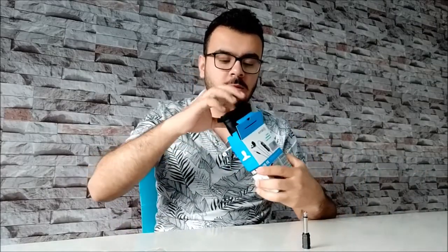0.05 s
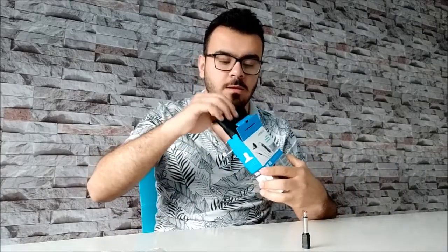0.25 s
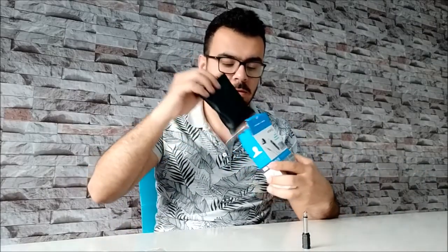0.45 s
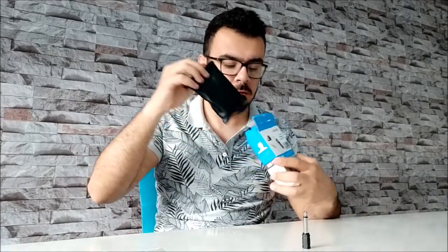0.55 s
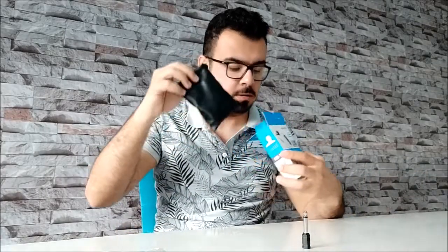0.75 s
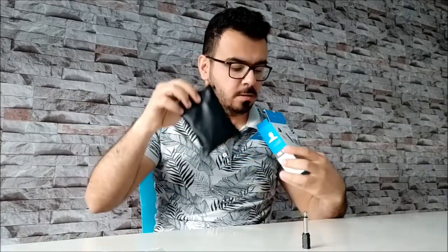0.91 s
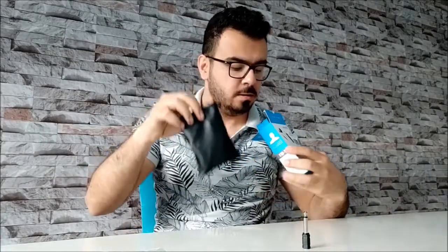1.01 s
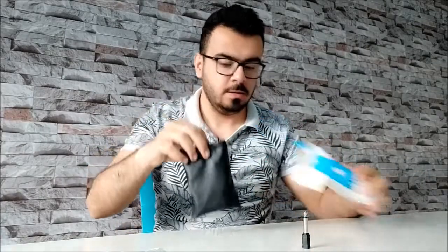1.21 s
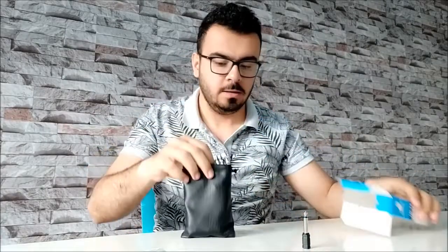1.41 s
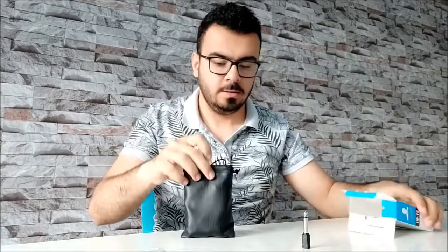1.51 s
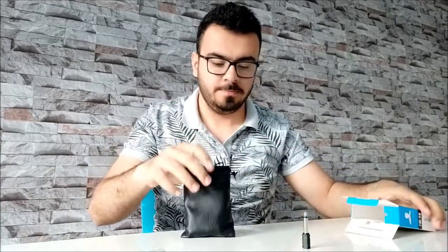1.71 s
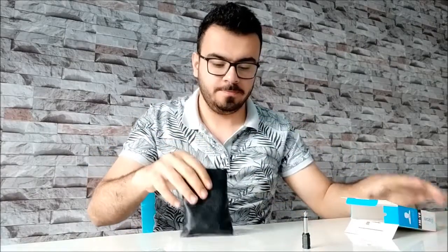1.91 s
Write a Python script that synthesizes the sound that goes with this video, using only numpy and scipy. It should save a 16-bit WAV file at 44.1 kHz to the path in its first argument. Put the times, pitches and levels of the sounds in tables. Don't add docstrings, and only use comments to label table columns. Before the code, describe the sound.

A light cardboard box gives up a soft pouch with a quick rub and pop, rustles quietly, then lands hollow on a tabletop, skids and settles with a last nudge; close stereo in a small reflective room with faint hiss.

```python
import sys
import numpy as np
from scipy import signal
from scipy.fft import rfft, irfft, next_fast_len
from scipy.io import wavfile
from scipy.ndimage import uniform_filter1d, minimum_filter1d, map_coordinates

SR = 44100
rng = np.random.default_rng(int(sys.argv[2]) if len(sys.argv) > 2 else 0)


def transcribe(u):
    v = np.clip(np.atleast_2d(u).T, -1, 1)
    q = np.round(v * 32767).astype(np.int16)
    wavfile.write(sys.argv[1], SR, q)


def gain_from_db(level_db):
    decades = np.asarray(level_db, float) / 20
    return 10 ** decades


N = 85995

# frequency in Hz, level in dB per Hz.
CARDBOARD = [(760, -12), (1300, -12), (2280, -9), (3200, -10), (3930, -9), (7250, -14), (9760, -4),
             (14300, -22), (15000, -49)]
# frequency in Hz, level in dB per Hz.
TABLE_TOP = [(600, -21), (1500, -2.5), (2100, -6.5), (2700, 1), (3350, -13), (3900, -1.5), (4600, -14),
             (9750, -3.5), (14500, -17.5)]
# frequency in Hz, width in Hz, level in dB.
OPEN_BOX = [(487, 150, -10), (1010, 100, -5.5), (1830, 160, -9)]
# frequency in Hz, width in Hz, level in dB.
BENT_BOX = [(706, 110, 0.85), (2410, 290, 0.71)]
# frequency in Hz, width in Hz, level in dB.
LAID_BOX = [(580, 270, -29), (238, 300, 3.5), (1050, 1560, -6)]
SIDES = np.array([[0.5], [-0.5]])


def unit(x):
    return x / np.sqrt(np.mean(x ** 2) + 1e-20)


def along(points, hz):
    f, value = np.transpose(points)
    return np.interp(np.log(hz + 1), np.log(f + 1), value)


def filtered(x, response):
    m = next_fast_len(x.shape[-1] + 8192)
    spectrum = rfft(x, m) * response(np.fft.rfftfreq(m, 1 / SR))
    return irfft(spectrum, m)[..., :x.shape[-1]]


def wobble(rate, size=N):
    return map_coordinates(rng.standard_normal(2000), [np.arange(size) * rate / SR])


def paired(spectrum, gain=1, size=N):
    # frequency in Hz, left-right likeness from 0 to 1.
    likeness = [(30, 0.62), (200, 0.59), (800, 0.2), (2000, 0.048), (10000, 0.043)]

    def mid_and_side(hz):
        turn = np.arccos(np.clip(along(likeness, hz), -1, 1)) / 2
        return gain_from_db(along(spectrum, hz)) * np.array([np.cos(turn), np.sin(turn)])

    mid, side = filtered(gain * rng.standard_normal((2, size)), mid_and_side)
    return unit(np.array([mid + side, mid - side]))


def patchy(x, depth_db):
    z = signal.stft(x, nperseg=256)[2]
    field = rng.standard_normal(z.shape[1:])
    field = uniform_filter1d(field, size=2, axis=0)
    field = uniform_filter1d(field, size=7, axis=1)
    return unit(signal.istft(z * gain_from_db(depth_db * unit(field)), nperseg=256)[1][:, :N])


def hollow_response(resonances, f):
    total = 0
    for k, (center, width, db) in enumerate(resonances):
        loss = 1j * f * width
        total = total + (-1) ** k * gain_from_db(db) * loss / (center * center - f * f + loss)
    return total


def rub(stroke, surfaces, boxes, grain_db, rate, turn_s=1, spike_db=1.5):
    s, level_db, hollow_db = np.transpose(stroke)
    t = np.arange(N) / SR
    clumps = gain_from_db(grain_db * wobble(rate) + spike_db * wobble(900))
    rings = filtered(clumps * rng.standard_normal(N),
                     lambda f: np.array([hollow_response(box, f) for box in boxes]))
    after = np.clip((t - turn_s) / 0.021 + 0.5, 0, 1)
    before = 1 - after
    grit = [patchy(paired(surface, clumps), depth_db=3) for surface in surfaces]
    body = unit(rings[0]) * before + unit(rings[1]) * after
    body = body * gain_from_db(np.interp(t, s, hollow_db) - 10.5)
    stroke_gain = gain_from_db(np.interp(t, s, level_db, -120, -120))
    return stroke_gain * (grit[0] * before + grit[1] * after + body)


def knocks(events, partials, below, lag_s, pan_db):
    # frequency in Hz, level in dB.
    crack_color = [(120, -13), (350, 3), (1000, 9), (3000, -2), (6000, -15), (9500, -6), (14000, -45)]
    out = np.zeros((2, N + SR))
    t = np.arange(SR // 6) / SR
    rise = 1 - np.exp(-t / 0.0018)
    for s, db, hz, t60, crack_db in events:
        uneven_db = rng.standard_normal(20)
        drift = 0.82 * wobble(170, size=len(t)) * (1 - np.exp(-t / 0.0046))
        modes = [(hz * ratio, d, abs(t60) * share) for ratio, d, share in partials] + below
        ring = 0
        for (f, d, life), extra_db in zip(modes, uneven_db):
            decay = gain_from_db(d + extra_db - 60 * t / max(life, 0.005))
            phase = 2 * np.pi * f * (t - lag_s * SIDES) + drift * min(f / hz, 1)
            ring = ring + decay * np.sin(phase)
        crack = paired(crack_color, size=len(t)) * gain_from_db(crack_db - 60 * t / 0.015)
        start = round(s * SR)
        out[:, start:start + len(t)] += gain_from_db(db + pan_db * SIDES) * (ring + crack) * rise
    return out[:, :N]


def pouch_slides_out():
    # time in seconds, rubbing in dB, hollow answer of the box in dB.
    pull = [
        (0.1, -75.5, 13.5),
        (0.202, -47.5, 3.5),
        (0.38, -38, -1),
        (0.388, -46.5, 5),
        (0.488, -65.5, -19),
        (0.496, -59.5, 19.5),
        (0.554, -68, -3),
        (0.584, -64, 9),
        (0.68, -78, -6),
    ]
    # frequency in Hz, level in dB per Hz.
    pouch = [(800, -57), (1500, -13.5), (2600, -12), (4300, -20), (7000, -4), (8500, -2), (12500, -11.5),
             (14500, -15)]
    # frequency in Hz, width in Hz, level in dB.
    held_box = [(748, 146, 7), (967, 70, 8.5), (1030, 160, 0)]
    empty_box = [(650, 150, -3), (360, 62, -6), (1340, 450, -4.5)]
    return rub(pull, [pouch, CARDBOARD], [held_box, empty_box], 0.31, 119.2, turn_s=0.369)


def seam_snaps():
    # time in seconds, peak in dB, pitch in Hz, T60 in seconds, crack in dB.
    seam = [
        (.375, -29, 765, 0.029, -22),
        (.38, -16.5, 741, 0.033, -7.5),
    ]
    # ratio to the pitch, level in dB, share of the T60.
    rim = [(0.96, 1, 1.05), (0.472, -9.5, 0.94), (.8, -10.5, 1.92), (1.235, -7.5, 1.31), (1.4, -8, 1.03),
           (2.17, -10.5, 0.8), (3.34, -17, 0.74)]
    return knocks(seam, rim, [], lag_s=-0.00003, pan_db=0.0)


def box_lands():
    # time in seconds, peak in dB, pitch in Hz, T60 in seconds, crack in dB.
    landings = [(1.406, -28, 674, 0.021, -4.5), (1.415, -41.5, 540, 0.027, 7),
                (1.441, -22, 556, 0.049, -13), (1.459, -31.5, 666, 0.051, -1.5),
                (1.469, -37, 562, 0.061, -2), (1.503, -33, 598, 0.074, -17), (1.534, -40, 565, 0.082, 6.5),
                (1.666, -41, 616, 0.053, -34), (1.7025, -43.5, 488, 0.077, 1),
                (1.723, -50.5, 479, 0.11, -17), (1.752, -57, 476, .07, -10), (1.793, -52.5, 780, 0.03, 9.5),
                (1.804, -47, 700, .03, -5), (1.812, -54, 810, 0.015, 0), (1.836, -55.5, 867, 0.04, 5),
                (1.87, -56, 800, 0.032, -3)]
    # ratio to the pitch, level in dB, share of the T60.
    pressed = [(1, 3, 0.89), (.8, -19, 0.82), (1.205, -0.5, 0.39)]
    # frequency in Hz, level in dB, T60 in seconds.
    thump = [(100, -27, 0.21), (177, -19.5, 0.1), (232, -18.5, 0.11), (291.3, -18.5, 0.15),
             (1045, -2, 0.021), (1110, -25, .03), (1580, -11, 0.037), (1910, -15, 0.023), (2260, -15, .035)]
    return knocks(landings, pressed, thump, lag_s=-0.00017, pan_db=1.1)


def box_drags():
    # time in seconds, rubbing in dB, hollow answer in dB.
    drag = [
        (1.507, -58, -2),
        (1.512, -49, 3),
        (1.521, -54, 8),
        (1.527, -44.5, 11),
        (1.545, -46, -1),
        (1.575, -48.5, -0.5),
        (1.605, -57.5, 3),
        (1.635, -66, 10.5),
        (1.78, -69, 15),
    ]
    return rub(drag, [TABLE_TOP, TABLE_TOP], [LAID_BOX, LAID_BOX], 1.4, 100)


def edge_skids():
    # time in seconds, rubbing in dB, hollow answer in dB.
    skid = [
        (1.405, -61.5, 30.5),
        (1.41, -57.5, 16.5),
        (1.435, -56.5, 14.5),
        (1.45, -58.5, 22.5),
        (1.49, -64, 20.5),
        (1.51, -51, 3),
    ]
    return rub(skid, [CARDBOARD, CARDBOARD], [LAID_BOX, LAID_BOX], 2.6, 130)


def last_nudge():
    # time in seconds, rubbing in dB, hollow answer in dB.
    nudge = [
        (1.781, -73, 12),
        (1.819, -68, -7),
        (1.826, -48.5, -4),
        (1.84, -50.5, -5.5),
        (1.875, -63.5, 1),
        (1.94, -72, 3),
    ]
    # frequency in Hz, level in dB.
    edge_grit = [(1200, -16), (2500, -10), (5000, -18), (6800, -12), (9000, -1.5), (12000, -5.5),
                 (15000, -26)]
    return rub(nudge, [TABLE_TOP, edge_grit], [OPEN_BOX, BENT_BOX], 1.6, 100, turn_s=1.82)


def edge_clicks():
    # time in seconds, peak in dB.
    ticks = [(0.382, -36), (.497, -52), (1.44, -29.5), (1.5012, -31.5), (1.5036, -32.5), (1.5142, -38),
             (1.5244, -28), (1.531, -32), (1.539, -40), (1.544, -38), (1.564, -50), (1.57, -39.5),
             (1.7, -54), (1.824, -38.5)]
    # frequency in Hz, level in dB.
    snap = [(2000, -16.5), (5000, -12.5), (9000, -1), (12000, -9.5), (16000, -18)]
    out = np.zeros((2, N + SR))
    t = np.arange(SR // 20) / SR
    rise = 1 - np.exp(-t / 0.00043)
    for s, db in ticks:
        start = round(s * SR)
        out[:, start:start + len(t)] += gain_from_db(db - 60 * t / 0.0089) * rise * paired(snap, size=len(t))
    return out[:, :N]


def flaps_rustle():
    # time in seconds, rubbing in dB, hollow answer in dB.
    flaps = [
        (0.96, -78.5, 10),
        (1.01, -54.5, 7.5),
        (1.066, -60.5, 1.5),
        (1.078, -50.5, 7),
        (1.13, -57.5, 6),
        (1.165, -64, -12),
        (1.368, -72.5, -29),
        (1.4, -68, -2),
    ]
    return rub(flaps, [CARDBOARD, CARDBOARD], [OPEN_BOX, BENT_BOX], 0.54, 90, turn_s=1.07)


def held_taps():
    # time in seconds, peak in dB, pitch in Hz, T60 in seconds, crack in dB.
    taps = [(.048, -52, 990, 0.024, 1), (.294, -42, 1030, 0.096, -22), (.18, -47.5, 930, 0.082, -22),
            (.348, -33.5, 540, 0.023, -17), (.35, -26.5, 905, 0.022, -10), (.402, -28.5, 622, 0.037, -15),
            (.427, -34, 705, 0.027, 2), (.497, -39.5, 730, 0.022, 4), (.595, -47, 947, 0.027, 5.5),
            (.88, -56, 950, 0.035, -22), (.916, -47.5, 986, 0.029, -27), (.966, -53.5, 1030, 0.036, -25),
            (1.102, -42, 680, 0.032, -10), (1.122, -45, 700, 0.022, -9), (1.169, -52, 880, 0.025, -16),
            (1.253, -48, 594, 0.03, -1), (1.348, -40, 650, 0.022, -6.5), (1.364, -49, 800, 0.035, 1),
            (1.378, -53, 680, 0.042, -2)]
    # ratio to the pitch, level in dB, share of the T60.
    held_modes = [(0.981, 1.5, 0.9), (.6, -16, 0.81), (1.21, -13.5, 0.82), (1.6, -11, 0.6)]
    return knocks(taps, held_modes, [], lag_s=-0.00005, pan_db=0.7)


def sweep():
    # time in seconds, level in dB.
    gust = [
        (1.15, -70),
        (1.22, -66.5),
        (1.28, -59.5),
        (1.36, -66),
        (1.42, -81),
    ]
    # frequency in Hz, level in dB.
    puff = [(40, -25), (70, 6.5), (130, -5), (200, -18.5), (300, -46)]
    s, db = np.transpose(gust)
    return gain_from_db(np.interp(np.arange(N) / SR, s, db, -120, -120)) * paired(puff)


def room(x):
    # frequency in Hz, T60 in seconds.
    decay = [(200, 0.58), (1000, 0.31), (4000, 0.4), (10000, 0.22)]
    # frequency in Hz, level in dB.
    walls = [(150, -4.5), (700, -8.5), (2000, -5.5), (10000, -7.5)]
    white = paired([(20, 0), (20000, 0)], size=SR // 2)
    hz, t, z = signal.stft(white, SR, nperseg=256)
    tail = signal.istft(z * gain_from_db(-60 * t / along(decay, hz)[:, None]), SR, nperseg=256)[1]
    tail = tail / np.linalg.norm(tail[0])
    delayed = np.pad(x.mean(0), (150, 0))[None]
    answer = signal.fftconvolve(delayed, tail, axes=1)[:, :N]
    return filtered(answer, lambda hz: gain_from_db(along(walls, hz)))


def through_ports(x):
    # frequency in Hz, level in dB.
    resonance = [(5000, 0.5), (9800, 4), (11300, -2.5), (13000, 1.5), (14300, 0.5)]
    # frequency in Hz, left over right in dB.
    balance = [(100, -0.5), (600, -1.5), (1400, -3), (3000, 1.5), (6000, -4.5), (9000, 1), (13000, 7)]
    return filtered(x, lambda hz: gain_from_db(along(resonance, hz) + along(balance, hz) * SIDES))


def noise_floor():
    # frequency in Hz, level in dB.
    hiss = [(59, -75), (100, -12), (249, -2), (347, -6.5), (393, -6.5), (829, -10.5), (1390, -11.5),
            (3060, -15.5), (14200, -15.5)]
    # frequency in Hz, level in dB.
    rumble = [(5.9, -18), (10, 3.5), (43, -3.5), (59, -9.5), (86, -10.5), (150, -29.5), (200, -48),
              (330, -120)]
    return (gain_from_db(-63) * paired(hiss) + gain_from_db(-59) * paired(rumble)) * gain_from_db([[-0.7], [0.7]])


def scene():
    box = pouch_slides_out() + seam_snaps() + held_taps() + flaps_rustle()
    box = box + box_lands() + edge_clicks() + edge_skids() + box_drags() + last_nudge()
    return through_ports(box + room(box)) + sweep() + noise_floor()


def band_limit(x):
    return signal.sosfilt(signal.butter(12, 15630, fs=SR, output="sos"), x)


def record(dry):
    low = filtered(dry, lambda hz: hz < 14250)
    top = dry - low
    power = (top ** 2).mean(0)
    quick = np.abs(uniform_filter1d(power, size=128))
    slow = np.abs(uniform_filter1d(power, size=3000))
    gate = (quick > gain_from_db(2 * 8) * slow) & (quick > gain_from_db(2 * -72))
    gate = 1 - minimum_filter1d(1 - gate, size=384)
    gate = uniform_filter1d(gate, size=128, output=float)
    mix = low + gain_from_db(-13) * gate * filtered(top, lambda hz: hz < 15800)
    return band_limit(mix)


dry = scene()
out = record(dry)
transcribe(out)
```